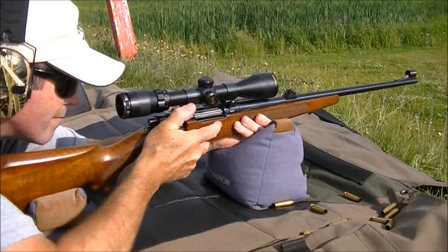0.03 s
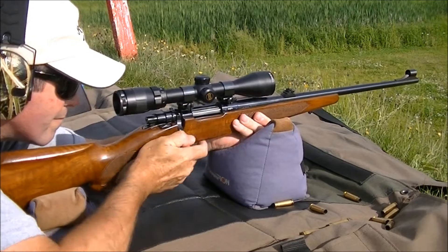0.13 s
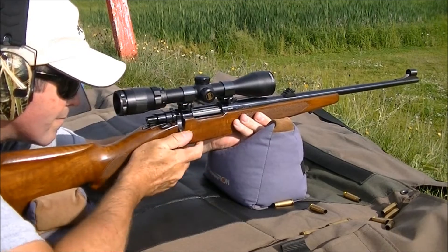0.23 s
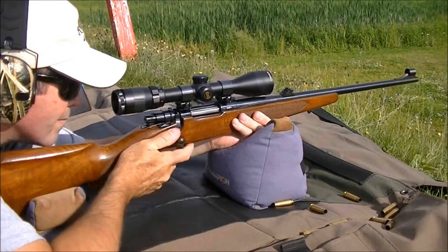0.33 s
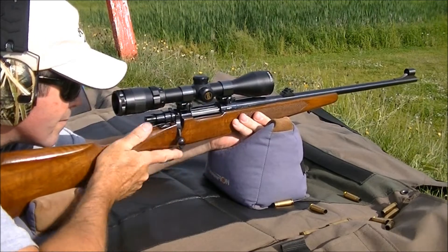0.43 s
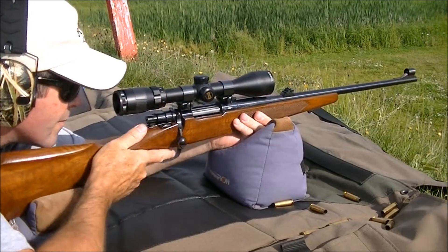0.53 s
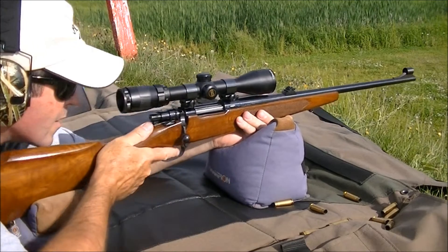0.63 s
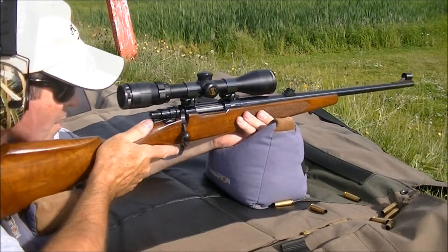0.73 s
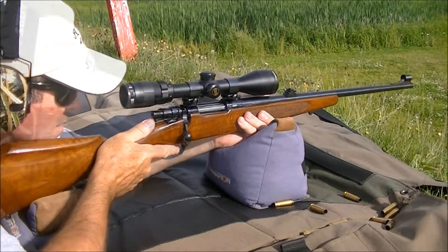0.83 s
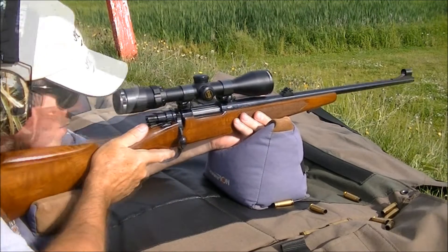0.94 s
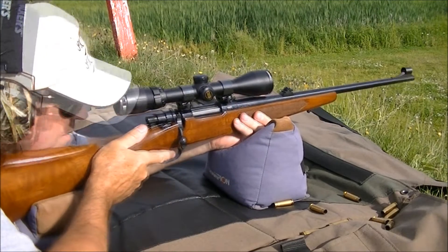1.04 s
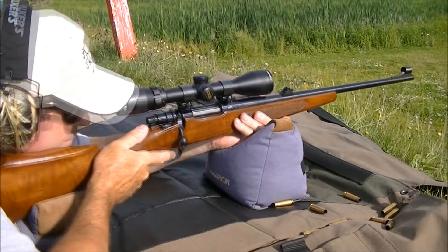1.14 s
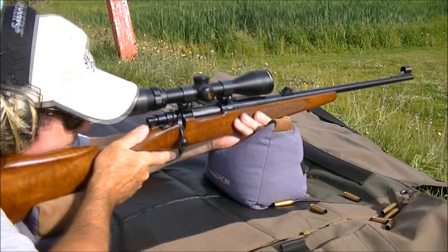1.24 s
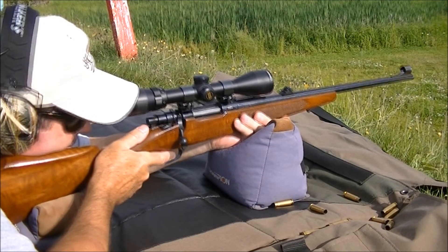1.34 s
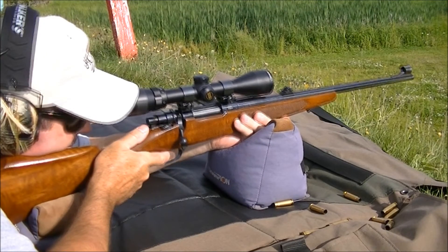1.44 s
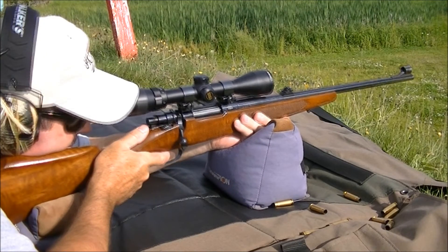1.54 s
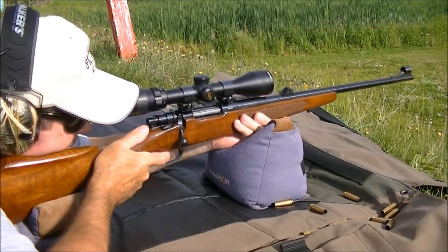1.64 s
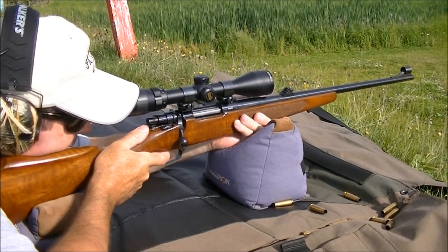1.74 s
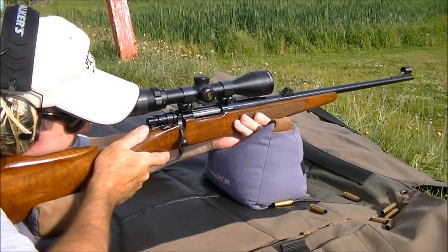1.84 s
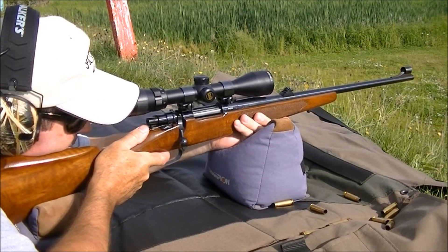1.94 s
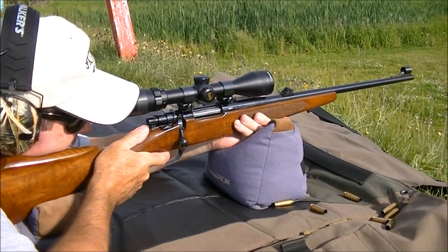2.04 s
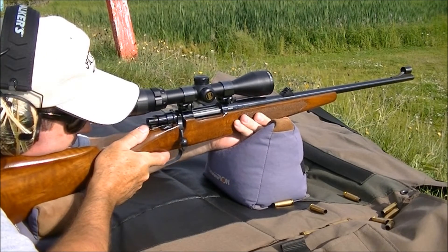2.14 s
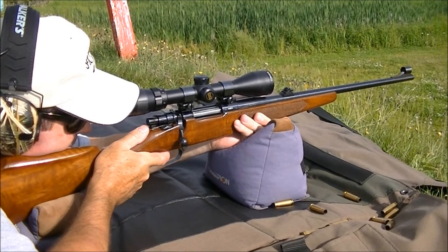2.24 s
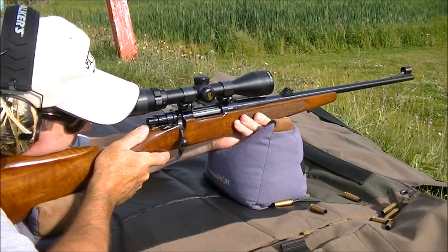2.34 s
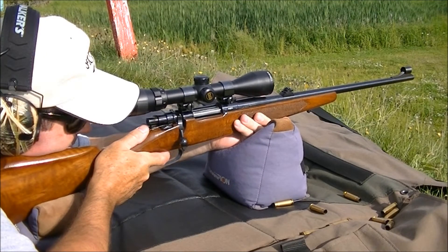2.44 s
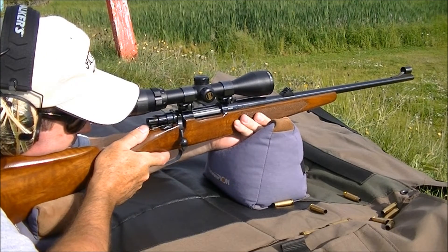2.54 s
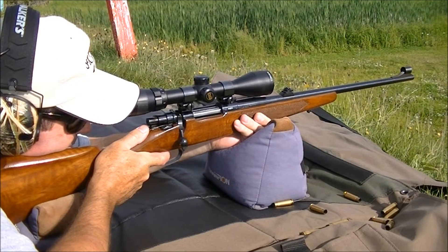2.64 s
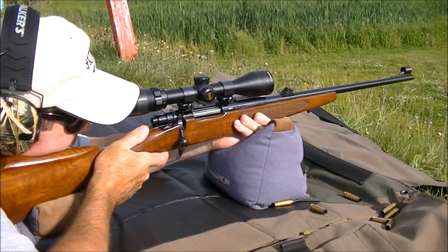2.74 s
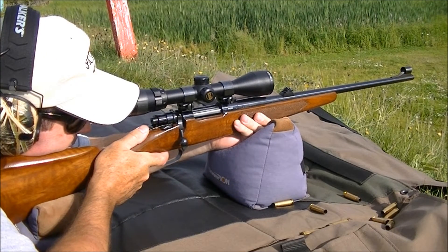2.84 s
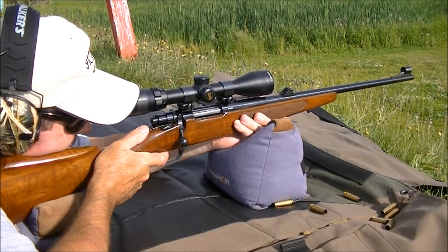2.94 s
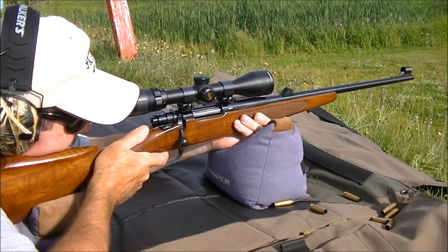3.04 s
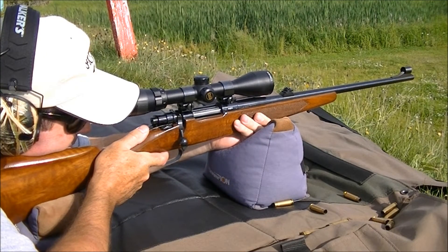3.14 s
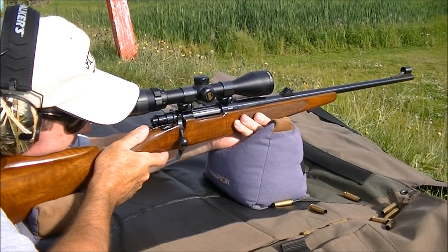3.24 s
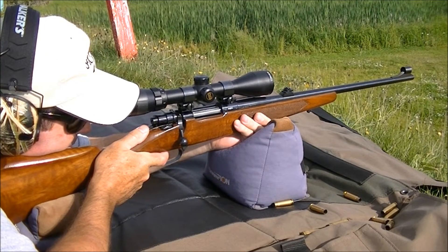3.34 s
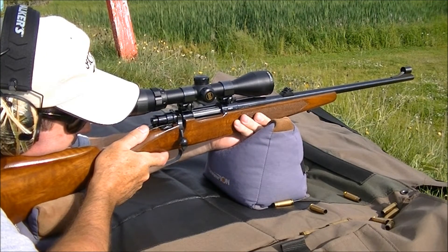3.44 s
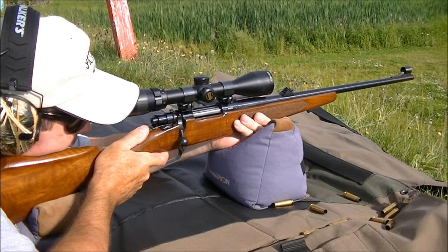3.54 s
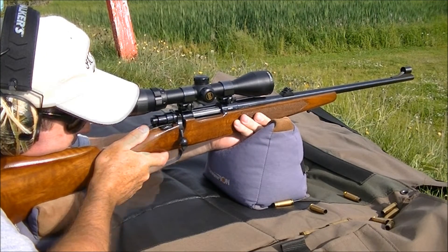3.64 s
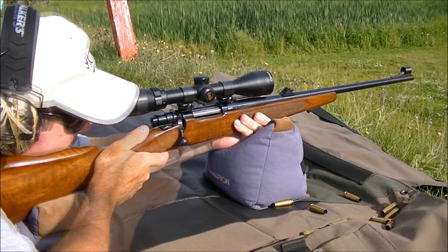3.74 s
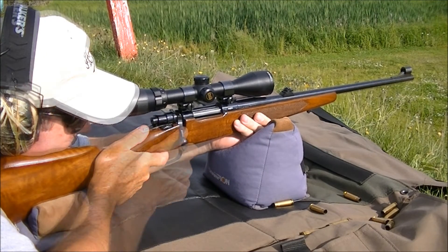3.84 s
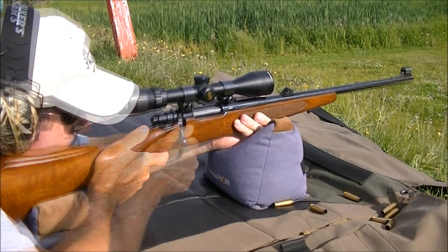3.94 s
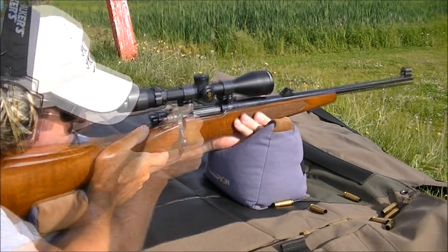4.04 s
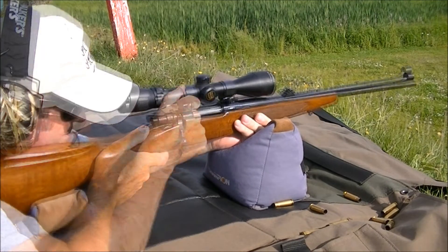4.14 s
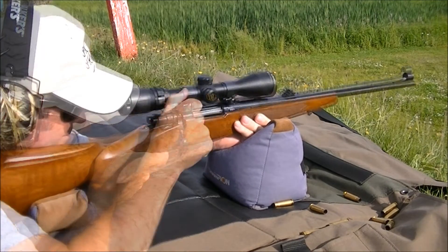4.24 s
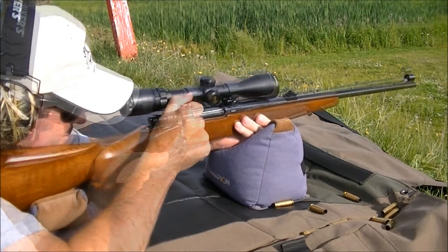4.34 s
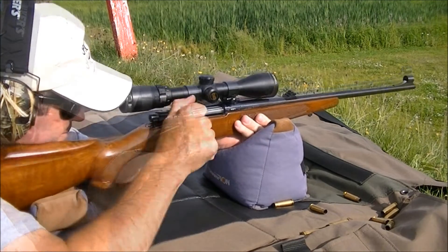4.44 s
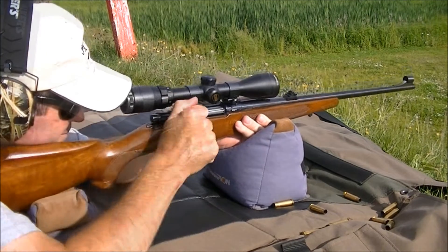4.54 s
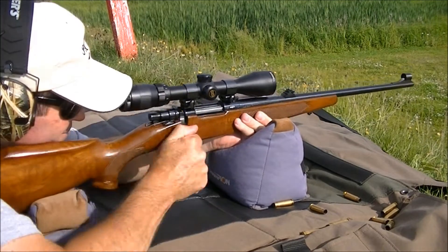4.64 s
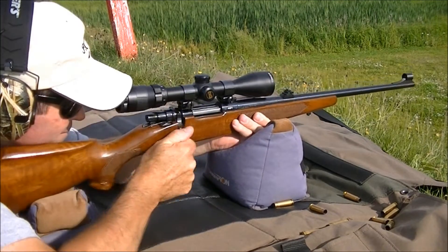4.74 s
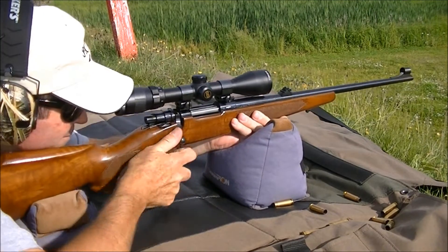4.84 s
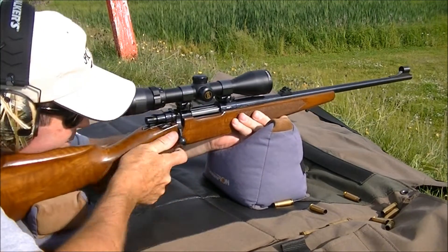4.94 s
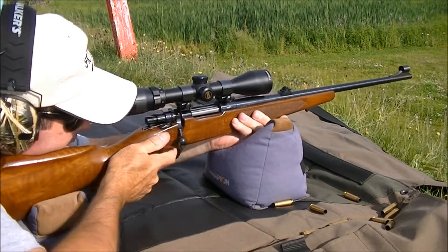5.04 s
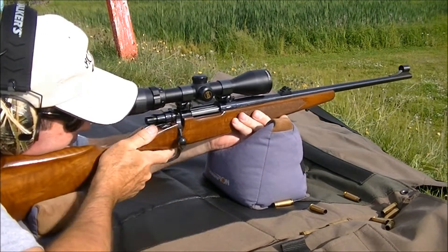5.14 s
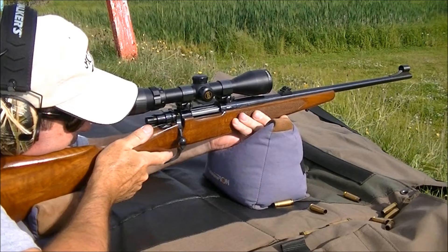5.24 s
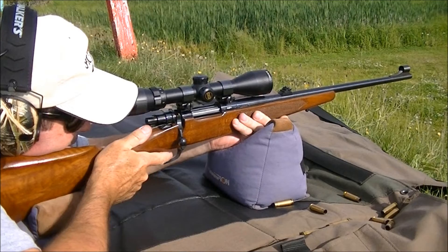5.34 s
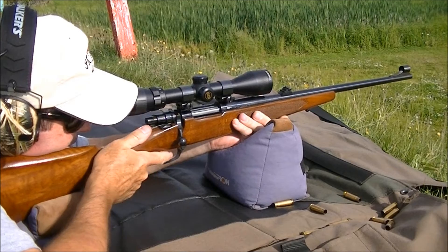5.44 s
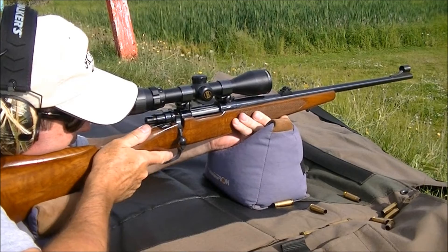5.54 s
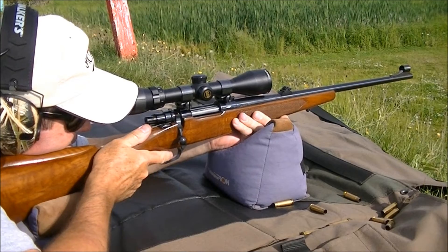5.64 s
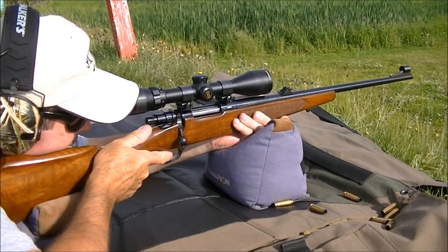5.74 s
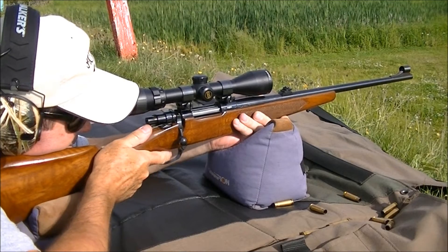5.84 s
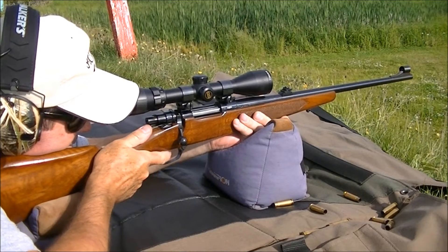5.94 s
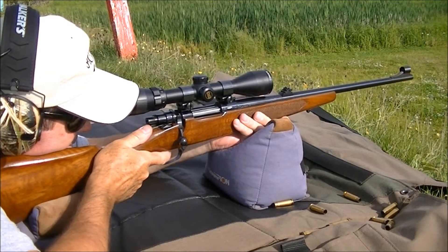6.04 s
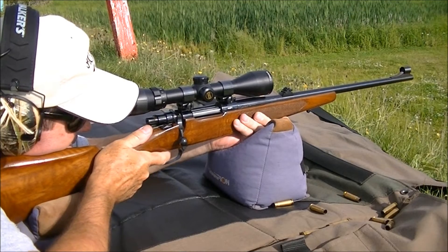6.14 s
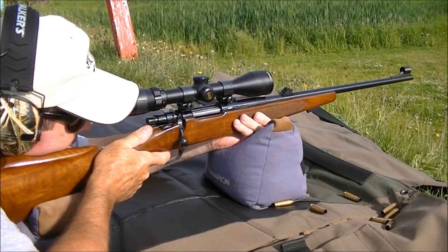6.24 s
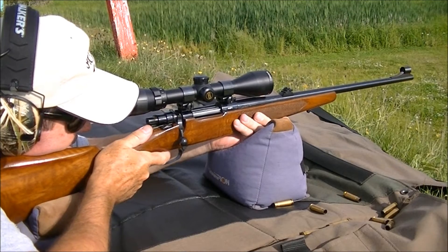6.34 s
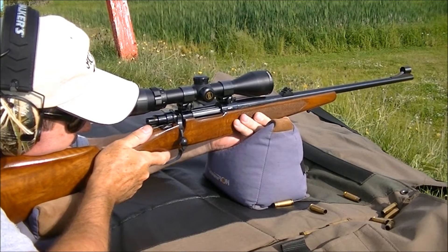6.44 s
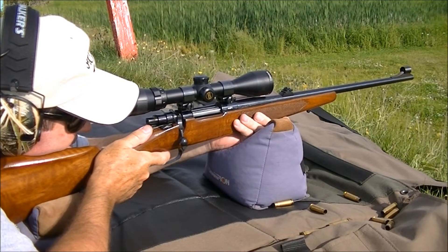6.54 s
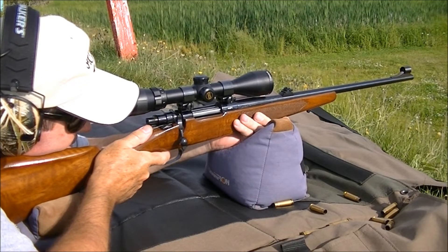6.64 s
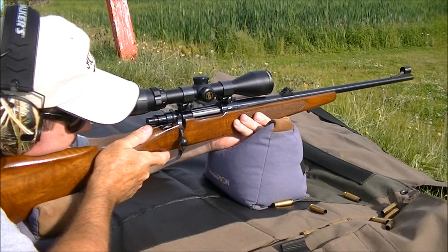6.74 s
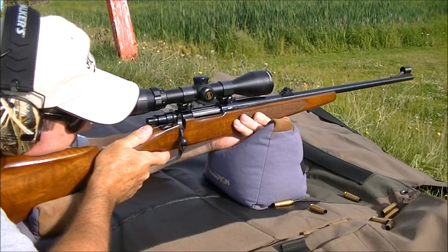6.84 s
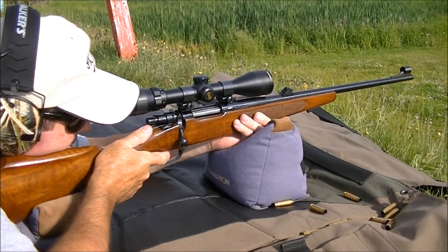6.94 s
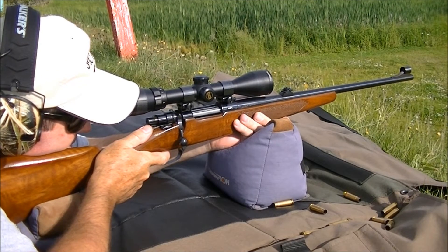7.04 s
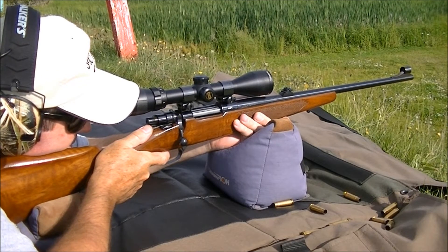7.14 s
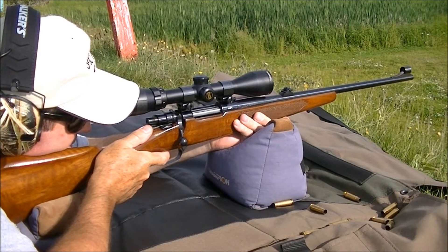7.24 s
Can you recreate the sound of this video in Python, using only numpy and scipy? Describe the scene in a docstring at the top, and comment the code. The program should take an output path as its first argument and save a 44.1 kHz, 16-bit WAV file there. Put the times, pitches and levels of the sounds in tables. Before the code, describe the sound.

Close, hard metallic clacks of a rifle bolt being worked and dry-fired outdoors, with wind buffeting, faint birds, then a neighbour's cracking gunshot echoing away.

```python
"""Wind rumbles over a faint hiss, and almost at once steel clacks: a rifle bolt is worked and dry-fired
on a grassy range, a metre or two from a small camera. The clacks are tiny impacts ringing the rifle's parts.
Fluttering noise and short thumps make the wind, sliding noise makes the sleeves, near sines make the birds.
Near the end a neighbour's shot cracks past as sharp pressure waves, and noise that dies away rattles back
from the crop and the far banks."""
import sys
import numpy as np
from scipy import signal
from scipy.fft import rfft, irfft
from scipy.io import wavfile
from scipy.ndimage import uniform_filter1d

SR = 44100
rng = np.random.default_rng(int(sys.argv[2]) if len(sys.argv) > 2 else 0)


def unload_audio(sound):
    """Save the sound as a 16-bit wav file, at the path given as the first command line argument."""
    columns = np.transpose(np.atleast_2d(sound))
    # keep every value between -1 and 1, then stretch to whole-number steps
    steps = np.round(np.clip(columns, -1, 1) * 32767)
    wavfile.write(sys.argv[1], SR, steps.astype(np.int16))


def amplitude_ratio(level_db):
    """Convert a level in decibels to the matching linear amplitude (field) ratio."""
    exponent = np.asarray(level_db, float) / 20
    return 10 ** exponent


N = 321489  # length [samples]

# All levels in the tables are those ahead of the camera.
# steel on steel: (start [s], peak [dB], treble [dB], rattle [ms], mode struck most squarely [Hz])
STEEL_CLACKS = [(.0552, -6.5, 6.5, 0.77, 9000), (.0838, -6.5, -9.5, 0.91, 1600),
                (.3915, -37, -28, 5.3, 1050), (1.3404, -33.5, -41, 4.9, 1330),
                (2.1146, -37, -20, 1.6, 1950), (2.6825, -1.5, 6.5, 6.8, 3740),
                (3.585, -35.5, -13, 3.6, 1740), (3.618, -42, 4, 2, 9000), (3.629, -42.5, 1, 2, 9000),
                (4.1135, -22.5, -11, 4.3, 2840), (4.1478, -3, 2.5, 2, 1830), (4.152, -4, -4, 5.3, 3450),
                (4.166, -21.5, -11, 13, 1700), (4.2278, -26.5, -10, 0.97, 7600),
                (4.236, -31, -43, 1.6, 3220), (4.438, -15.5, -8, 3.1, 2390),
                (4.4455, -22.5, -28, 4.3, 2080), (4.452, -19.5, -18, 1.9, 1900),
                (4.6765, -2, -12.5, 1.35, 2000), (4.682, -25, -20, 2.7, 1870),
                (4.7237, -40.5, -26, 1.7, 1700)]
# ringing of receiver and stock, before the hand damps it:
# (frequency [Hz], level [dB], time to fall 60 dB [s])
RIFLE_MODES = [(1050, -19, 0.021), (1490, -16, 0.13), (1740, -2.5, 0.22), (1990, -3, 0.071),
               (2180, 3, 0.014), (2840, 4, 0.016), (3484, 5.5, 0.071), (4260, 0, 0.036), (4720, 7, 0.055),
               (5566, -11, 0.032), (7600, -3.5, 0.042), (9000, -8, 0.0178), (10700, -9, 0.01)]
# shock waves of the shot, direct and off nearby surfaces: (front [s], size [dB], length [ms])
SHOCK_WAVES = [(6.2452, -4, 0.88), (6.248, -8, 1.4), (6.2513, 8, 0.43), (6.2536, -3, 2.04),
               (6.257, -4.5, 1.67), (6.2599, -2.5, 0.82)]
# the shot scattered back by stands of crop and banks:
# (start [s], level [dB], first fade [dB/s], treble [dB], bass [dB])
SCATTERED_RETURNS = [(6.252, -22, 170, -2, -3), (6.262, -20.5, 157, 10, -5.5), (6.327, -17.5, 33, -3, -26),
                     (6.565, -27, 120, -5.5, -18), (6.692, -29, 216, -14, -9),
                     (6.736, -36, 80.5, -11, -17.5)]
# slaps off single surfaces: (middle [s], peak [dB], width at half height [ms])
SURFACE_SLAPS = [(6.332, -9, 1.8), (6.345, -8, 4.3), (6.362, -8.5, 11), (6.576, -17, 4.1),
                 (6.598, -21.5, 3.5), (6.649, -32, 2.4), (6.697, -26, 5.5), (6.743, -19.5, 1.6),
                 (6.752, -18, 1.18), (6.911, -16, 5.1), (6.919, -23, 6.9)]
# wind on the microphone: (time [s], level [dB])
GUST_LEVEL = [(0.0, -52.5), (0.14, -49.5), (0.26, -64.5), (0.9, -45), (1.08, -53), (1.3, -47), (1.5, -63),
              (1.95, -48), (2.29, -68), (3.4, -58.5), (3.66, -39), (3.98, -59), (4.07, -33), (4.54, -40),
              (4.63, -52), (5.22, -60.5), (5.38, -47.5), (5.9, -58.5), (6.1, -44), (6.45, -47.5),
              (6.7, -42.5), (6.9, -52.5), (7.29, -58.5)]
# the hardest buffets: (start [s], thump size [dB], thump pitch [Hz], sharp edge against the thump [dB])
HARD_BUFFETS = [(0.337, -27, 235, -0.5), (0.388, -16.5, 271, -1), (0.494, -34, 257, -27),
                (0.872, -26.5, 221, -26), (1.337, -16.5, 232, 7.5), (1.472, -28.5, 196, -6),
                (1.73, -25.5, 300, 2), (1.746, -26, 231, -4), (1.97, -30.5, 152.6, -4),
                (2.107, -38, 203, 3), (2.152, -32, 197, -6), (2.172, -33, 300, -2.5),
                (2.461, -42, 200, -27), (2.731, -35.5, 160, -21), (2.988, -37, 285, -26),
                (3.122, -36, 228, -29), (3.501, -23, 269, 0.5), (3.605, -22, 385, -9),
                (3.634, -22, 288, -1.5), (3.758, -29, 250, 1), (3.947, -29, 228, -8),
                (4.049, -19.5, 318, 1), (4.09, -22, 370, -10), (4.135, -17, 327, 1), (4.142, -15, 300, -4),
                (4.24, -14, 420, -0.5), (4.295, -20, 372, -5), (4.315, -22, 211, -6),
                (4.387, -28, 208, -40), (4.457, -20, 342, -28), (4.543, -22, 278, 1.5),
                (4.556, -22.5, 436, 4), (4.596, -31, 254, -25), (4.83, -27, 212, -29), (4.912, -20, 286, 2),
                (5.094, -34, 269, -8), (5.375, -27, 306, -9), (5.513, -27.5, 151, 5.5),
                (5.575, -30, 268, -9), (5.965, -22.5, 380, 3), (6.102, -27.5, 243, -10),
                (6.643, -25.5, 201, -2), (6.668, -24.5, 195, 1), (6.697, -21, 239, -9),
                (6.806, -31, 160, -17.5), (7.061, -29, 202, -29)]
# cloth and skin sliding: (middle [s], width at half height [ms], hiss [dB], duller rub [dB])
CLOTH_SLIDES = [(.27, 73, -68, -67), (0.391, 127, -58, -52.5), (1.15, 1700, -70, -60.5),
                (1.849, 216, -89, -73.5), (3.548, 225, -69, -62), (3.79, 260, -65.5, -60),
                (3.97, 80, -59.5, -57.5), (4.077, 116, -53, -52.5), (4.3, 60, -83, -59),
                (4.64, 120, -67.5, -55.5), (4.841, 226, -61, -59), (5.24, 140, -74, -62.5),
                (6.121, 140, -69, -63.5), (7.098, 390, -87, -61)]
# whistled notes: (start [s], length [s], settled pitch [Hz], loudest level [dB])
BIRD_WHISTLES = [(1.99, 0.13, 4010, -58), (6.073, 0.17, 4016, -52.5)]
# pulsed trills: (start [s], length [s], highest pitch [Hz], starting level [dB])
BIRD_TRILLS = [(0.919, .42, 3380, -64.5), (4.92, 0.387, 3420, -71.5)]
# runs of three chips: (middle of the first [s], pitch [Hz], level of the first [dB])
BIRD_CHIPS = [(1.441, 4620, -64.5), (5.683, 4500, -63.5)]
# one upward sweep: (start [s], length [s], from [Hz], to [Hz], level [dB])
BIRD_SWEEP = (5.985, .05, 5000, 7700, -64)
# colour of the far hiss, only relative: (frequency [Hz], level per Hz [dB])
HISS_COLOUR = [(35, -43.5), (60, 13), (146, -1.5), (274, -23), (503, -18), (1580, -20.5), (2300, -18),
               (2520, -18), (9350, -28), (13900, -35), (16000, -39.5)]


def band(x, lo_hz, hi_hz, order=2):
    """Keeps only the sound between two frequencies (Butterworth band-pass)."""
    sos = signal.butter(order, [lo_hz, min(hi_hz, .45 * SR)], "band", fs=SR, output="sos")
    return signal.sosfilt(sos, x)


def unit(x):
    """Scales to rms 1."""
    return x / np.sqrt(np.mean(x ** 2))


def curves(table):
    """Turns table columns into sample-by-sample curves."""
    s, *columns = np.transpose(table)
    return [np.interp(np.arange(N) / SR, s, c) for c in columns]


def walk(rate):
    """Makes a wandering curve with a new random target every 1 / rate s; its spread is near 1."""
    hold = int(SR / rate)
    steps = np.repeat(rng.standard_normal(N // hold + 1), hold)
    return unit(uniform_filter1d(steps, hold)[:N])


def add(out, s, sound):
    """Mixes a sound in from time s."""
    i = min(max(int(s * SR), 0), N)
    out[i:i + len(sound)] += sound[:N - i]


def bell(ms):
    """Makes a smooth bump, ms wide at half height, and its time axis in s."""
    half = int(ms * SR / 1000)
    t = np.arange(-half, half + 1) / SR
    return np.cos(np.pi / 2 * t * 1000 / ms) ** 2, t


def note(length, hz, db):
    """Makes a near sine with soft ends; hz and db are functions of time in s."""
    t = np.arange(int(length * SR)) / SR
    ends = np.clip(np.minimum(t / .012, (length - t) / 0.052), 0, 1)
    return np.sqrt(2) * ends * amplitude_ratio(db(t)) * np.sin(2 * np.pi * np.cumsum(hz(t)) / SR)


def bolt():
    """Rattles steel on steel: each clack is a burst of tiny impacts that ring the rifle's modes."""
    rise_share, rise_max_ms = 0.32, 1.1  # a rattle swells over this share of its length, at most this long
    fade_ms, grip_ms = 20.1, 40.  # times to fall 60 dB: impacts after the rattle, ring under the hand
    crack_db, struck_db = 2, 9.5  # direct crack before its treble part, boost of the struck mode
    out, t = np.zeros(N), np.arange(4096) / SR
    ms = t * 1000
    # every listed mode is a cluster of three close ones
    hz, db, t60 = np.repeat(np.transpose(RIFLE_MODES), 3, axis=1)
    for s, peak_db, treble_db, rattle, struck_hz in STEEL_CLACKS:
        grit, grit_level = rng.standard_normal((2, len(t)))
        mix_shake, pitch_shake = rng.standard_normal((2, len(hz)))
        rise = min(rise_share * rattle, rise_max_ms)
        contact = np.minimum(ms / rise, 1) ** 2 * amplitude_ratio(-60 * np.maximum(ms - rattle, 0) / fade_ms)
        impacts = contact * grit * amplitude_ratio(1.48 * grit_level)
        # harder contact drives the high modes; every blow lands elsewhere and stirs another mix
        tilt = treble_db * np.log2(hz / 2000.) / 2
        struck = struck_db * np.exp(-(np.log(hz / struck_hz) / 0.1) ** 2)
        gains = amplitude_ratio(db + tilt + 2 * mix_shake + struck)
        sines = np.sin(2 * np.pi * np.outer(hz * (1 + 0.03 * pitch_shake), t))
        ring = gains @ (sines * amplitude_ratio(-60 * t / t60[:, None]))
        ring = ring * amplitude_ratio(-60 * ms / grip_ms)  # the gripping hand damps the ring
        low_crack = unit(band(impacts, 1300.0, 2400.0, order=1))
        crack = low_crack + amplitude_ratio(treble_db) * unit(band(impacts, 2100.0, 11000.0))
        ringing = unit(signal.fftconvolve(impacts, ring)[:len(t)])
        clack = ringing + amplitude_ratio(crack_db + treble_db / 2) * crack
        add(out, s, amplitude_ratio(peak_db) * clack / np.abs(clack).max())
    return out


def shot():
    """Joins the parts of the neighbour's shot: its shocks, scattered returns and single slaps."""
    return shocks() + scatter() + slaps()


def shocks():
    """Makes N-shaped shock waves: pressure jumps up, drops below rest, then jumps back."""
    edge_ms, edge_doubles_ms = 0.019, 3.65  # fronts soften with every later bounce
    out, ms = np.zeros(N), np.arange(-60, 300) * 1000 / SR
    fired = SHOCK_WAVES[0][0]
    for s, peak_db, length in SHOCK_WAVES:
        edge = edge_ms * 2 ** (1000 * (s - fired) / edge_doubles_ms)
        inside = (np.tanh(ms / edge) - np.tanh((ms - length) / edge)) / 2
        ramp = 1 - 2 * ms / length
        add(out, s + ms[0] / 1000, amplitude_ratio(peak_db) * inside * ramp * np.abs(ramp) ** 1.5)
    return out


def scatter():
    """Stands noise in for countless small echoes from stalks and banks, duller as each return goes on."""
    rise_ms, flutter_db, flutter_rate = 4.4, 2.5, 300.  # swell of each return, then its wavering [steps/s]
    air_db_per_s, bass_fade_db_per_s = 44.5, 28.5  # treble and bass fade faster than the middle
    thin_out_db_per_s2 = 154  # the fade steepens as a return runs out of stalks
    power, t = np.zeros((4, N)), np.arange(SR) / SR
    for s, level_db, fade, treble_db, bass_db in SCATTERED_RETURNS:
        level = level_db - fade * t - thin_out_db_per_s2 * t ** 2
        swell = np.minimum(1000 * t / rise_ms, 1) * amplitude_ratio(level)
        bass = bass_db - bass_fade_db_per_s * t
        treble = treble_db - air_db_per_s * t
        for row, db in zip(power, (bass, 0, treble, 2 * treble - 19.5)):
            add(row, s, (swell * amplitude_ratio(db)) ** 2)
    stalks = rng.standard_normal(N) * amplitude_ratio(3. * rng.standard_normal(N))
    bands = [unit(band(stalks, 416.0, 1330.0)),
             unit(band(stalks, 1580.0, 5200.0, order=3)),
             unit(band(stalks, 3500.0, 7650.0)),
             unit(band(stalks, 9500.0, 13000.0))]
    return amplitude_ratio(flutter_db * walk(flutter_rate)) * np.sum(np.sqrt(power) * bands, axis=0)


def slaps():
    """Makes short noise bumps for echoes off single surfaces; later ones come from further and are duller."""
    first_hz, octaves_per_s = 3870, 2.69  # middle pitch at the first shock, and its fall with delay
    out, fired = np.zeros(N), SHOCK_WAVES[0][0]
    for s, peak_db, length in SURFACE_SLAPS:
        shape = bell(length)[0]
        hz = first_hz * 2 ** (-octaves_per_s * (s - fired))
        slap = band(rng.standard_normal(2048), hz / 2, 2 * hz)[-len(shape):] * shape
        add(out, s - length / 1000, amplitude_ratio(peak_db) * slap / np.abs(slap).max())
    return out


def wind():
    """Lets eddies shake the microphone: a rumble that follows the gusts, with separate buffets on top."""
    gust_db, = curves(GUST_LEVEL)
    return rumble(gust_db) + buffets(gust_db)


def rumble(gust_db):
    """Makes fluttering low noise, with a larger share of its higher bands in stronger gusts."""
    flutter_db, flutter_rate, hz = 6., 110., 210.  # most flutter either way, steps per s, middle pitch
    eddies = rng.standard_normal(N) * amplitude_ratio(flutter_db * np.tanh(walk(flutter_rate)))
    deep = unit(band(eddies, 0.35 * hz, 1.322 * hz))
    bright = unit(band(eddies, 1.06 * hz, 2.24 * hz))
    sharp = unit(band(eddies, 3.4 * hz, 7.5 * hz))
    strength = gust_db + 40.5
    mix = deep + amplitude_ratio(0.71 * strength - 4.0) * bright + amplitude_ratio(0.232 * strength - 30.5) * sharp
    return amplitude_ratio(gust_db - 2) * mix


def buffets(gust_db):
    """Thumps the microphone with short bursts of a low sine, each with a higher, shorter edge."""
    stray_per_s, stray_db, spread_db = 40, 15, 8  # lesser buffets at random: size over gust, random cut
    stray_hz, hz_per_db, stray_edge_db = 300., 7., -14  # pitch rises with the gust
    turns, edge_hz = 1.3, 426  # thump width at half height, before squaring [cycles]; pitch of the edge
    when, size, pitch = rng.random((int(stray_per_s * N / SR), 3)).T
    i = (when * N).astype(int)
    peaks = gust_db[i] + stray_db - spread_db * size
    pitches = np.maximum(stray_hz + hz_per_db * (gust_db[i] + 40.5), 120) * (.75 + pitch / 2)
    stray = np.transpose([i / SR, peaks, pitches, np.full(len(i), stray_edge_db)])
    out = np.zeros(N)
    for s, peak_db, hz, edge_db in HARD_BUFFETS + list(stray):
        turn = rng.random(6)
        shape, t = bell(1000 * turns / hz)
        thump = shape ** 2 * np.sin(2 * np.pi * (hz * t + turn[0]))
        edge = np.exp(-(t * edge_hz / 0.17) ** 2) * np.sin(2 * np.pi * (edge_hz * t + turn[1]))
        add(out, s, amplitude_ratio(peak_db) * (thump + amplitude_ratio(edge_db) * edge))
        # weaker eddies shed just before and after make it ragged
        add(out, s - (1.136 + turn[2]) / hz, amplitude_ratio(peak_db - 10.5 - 7.5 * turn[3]) * thump)
        add(out, s + (1.092 + turn[4]) / hz, amplitude_ratio(peak_db - 4.0 - 5.8 * turn[5]) * thump)
    return out


def clothes():
    """Rustles the shooter's clothes: flickering noise, a bright hiss and a duller rub for each slide."""
    hiss_level, rub_level = np.zeros((2, N))
    for s, ms, hiss_db, rub_db in CLOTH_SLIDES:
        add(hiss_level, s - ms / 1000, amplitude_ratio(hiss_db) * bell(ms)[0])
        add(rub_level, s - ms / 1000, amplitude_ratio(rub_db) * bell(ms)[0])
    bright = unit(band(rng.standard_normal(N), 3700.0, 14000.0))
    dull = unit(band(rng.standard_normal(N), 1100.0, 3100.0, order=1))
    return hiss_level * amplitude_ratio(0.94 * walk(86.0)) * bright + rub_level * amplitude_ratio(2 * walk(70.0)) * dull


def birds():
    """Joins whistles, pulsed trills, one sweep and short chirps, all near sines."""
    return whistles() + trills() + sweep() + chirps()


def whistles():
    """Whistles notes that drop quickly onto their pitch, then sag; loudest a third of the way in."""
    drop_hz, settle_s, sag_hz_per_s, fade_db_per_s = 200., .012, 300., 90.
    out = np.zeros(N)
    for s, length, hz, db in BIRD_WHISTLES:
        add(out, s, note(length,
                         lambda u: hz + drop_hz * np.exp(-u / settle_s) - sag_hz_per_s * u,
                         lambda u: db - fade_db_per_s * np.abs(u - length / 3)))
    return out


def trills():
    """Pulses a tone whose pitch arches, highest a third of the way in."""
    pulses_per_s, arch_hz_per_s2, rise_db_per_s = 47., 3100, 2
    out = np.zeros(N)
    for s, length, hz, db in BIRD_TRILLS:
        tone = note(length,
                    lambda u: hz - arch_hz_per_s2 * (u - length / 3) ** 2,
                    lambda u: db + rise_db_per_s * u)
        t = np.arange(len(tone)) / SR
        pulses = 2 * np.cos(np.pi * pulses_per_s * t) ** 2
        add(out, s, tone * pulses * amplitude_ratio(1.1 * walk(30.)[:len(t)]))
    return out


def sweep():
    """Slides one note upward, fast at first and slower near the top."""
    out = np.zeros(N)
    s, length, from_hz, to_hz, db = BIRD_SWEEP
    add(out, s, note(length,
                     lambda u: to_hz - (to_hz - from_hz) * (1 - u / length) ** 2,
                     lambda u: db + 0 * u))
    return out


def chirps():
    """Makes sine blips: runs of three chips, each with a lower answer, and a far bird that goes on and on."""
    gap_s, chip_ms, swell_db = .147, 14., 2.5  # each chip of a run is louder than the last
    answer_s, answer_db = .05, -62  # delay and level of the answer
    far_hz, far_per_s, far_db = 2380., 6.92, -61  # far_db is the loudest a far chirp can be
    out, last_s = np.zeros(N), (N - 1) / SR
    blips = [(s + k * gap_s, hz, db + k * swell_db, chip_ms)
             for s, hz, db in BIRD_CHIPS for k in (0, 1, 2)]
    blips += [(s + answer_s, far_hz, answer_db, ms) for s, hz, db, ms in blips]
    for k, (late, pitch, quiet) in enumerate(rng.random((int(far_per_s * last_s), 3))):
        s = (k + .62 + 0.11 * late) / far_per_s
        if s < last_s:
            blips.append((s, far_hz * (1 + 0.059 * (pitch - .5)), far_db - 21.0 * quiet, 16.))
    for s, hz, db, ms in blips:
        shape, t = bell(ms)
        add(out, s - ms / 1000, np.sqrt(2) * amplitude_ratio(db) * shape * np.sin(2 * np.pi * hz * t))
    return out


def field():
    """Hisses like far grass and air: steady noise with a set colour and a slight wavering."""
    hz, db = np.transpose(HISS_COLOUR)
    f = np.maximum(np.arange(N // 2 + 1) * SR / N, 1)
    colour = amplitude_ratio(np.interp(np.log(f), np.log(hz), db))
    hiss = irfft(rfft(rng.standard_normal(N)) * colour, N)
    # the level, near -62 dB, is that of the part above 540 Hz
    return hiss / np.std(band(hiss, 540.0, 16000.)) * amplitude_ratio(-62 + 0.62 * walk(1.8))


def scene():
    """Adds all sources at the single microphone."""
    return (bolt() + shot() + wind() + clothes() + birds() + field())[None]


def low_pass(x):
    """Removes everything above the highest recorded frequency."""
    return signal.sosfilt(signal.butter(12, 16550, fs=SR, output="sos"), x)


def record(dry):
    """The camera cuts the bass, softens the top and rounds the loudest peaks."""
    thin = signal.sosfilt(signal.butter(3, 130., "high", fs=SR, output="sos"), dry)
    soft = signal.sosfilt(signal.butter(2, 16000., fs=SR, output="sos"), thin)
    mix = np.tanh(1.526 * soft) / np.tanh(1.3)  # also lifts quiet sounds by about 5 dB
    return low_pass(mix)


dry = scene()
out = record(dry)
unload_audio(out)
```